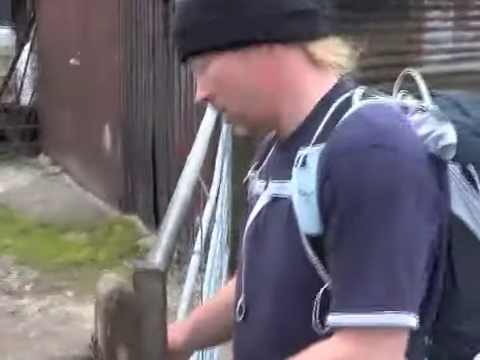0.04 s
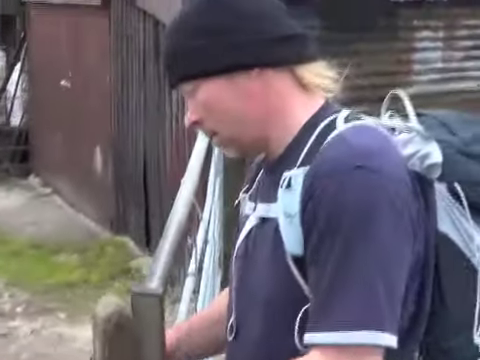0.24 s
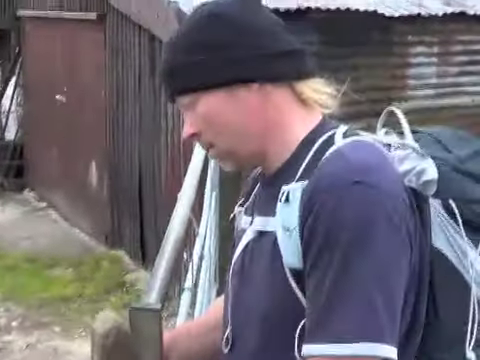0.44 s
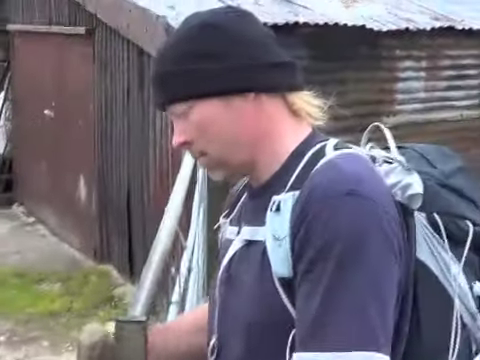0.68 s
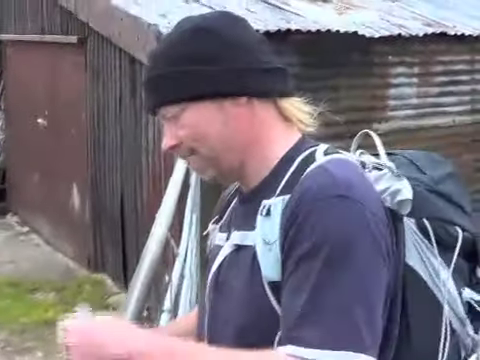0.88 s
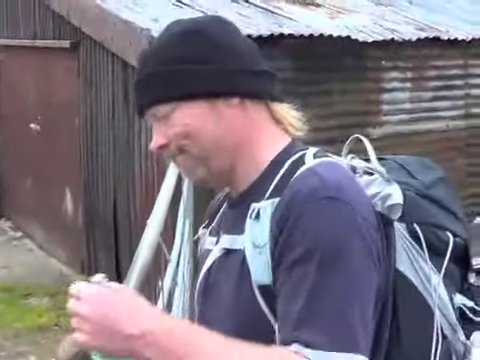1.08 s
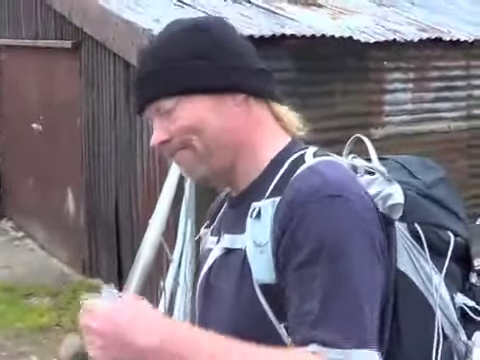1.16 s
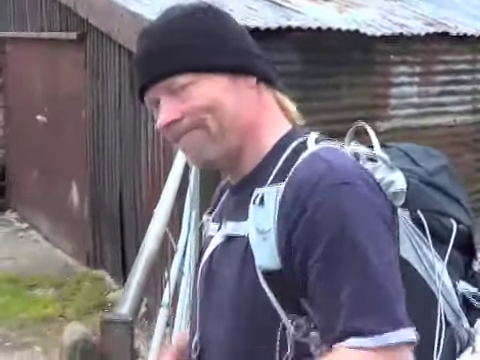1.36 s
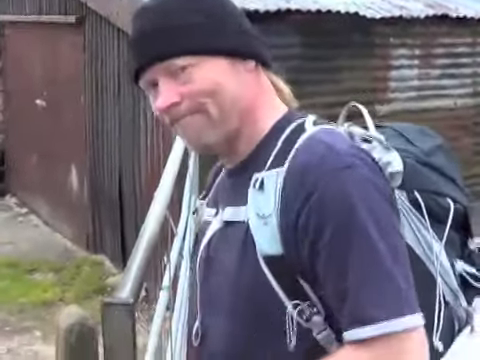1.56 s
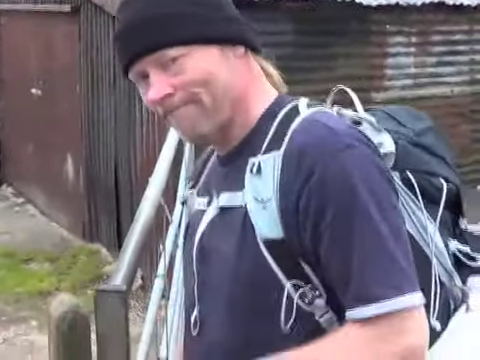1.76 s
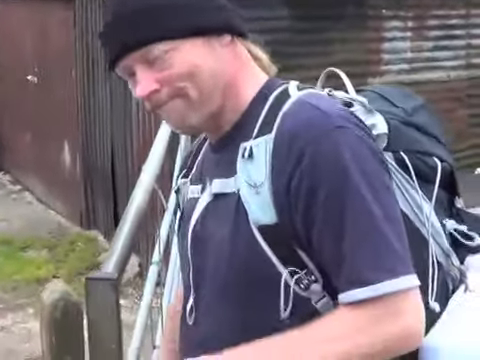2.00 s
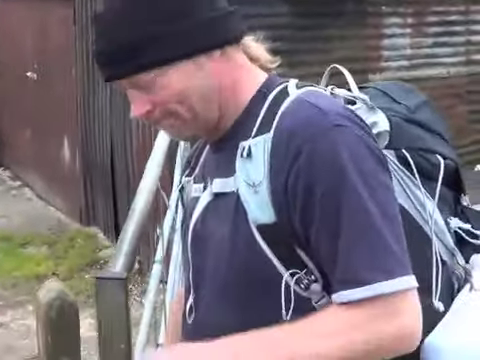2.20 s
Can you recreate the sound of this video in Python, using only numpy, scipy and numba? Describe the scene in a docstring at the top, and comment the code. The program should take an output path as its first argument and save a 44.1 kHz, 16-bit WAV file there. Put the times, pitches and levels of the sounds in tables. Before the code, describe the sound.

A steel chain is unhooked from a hollow tubular gate, heard close outdoors. Dry link ticks and light clinks open the first half second. From about 0.7 seconds bright jangles and short scraping slides ring on the tube, strongest near 0.85, 1.2 and 1.8-2.0 seconds. Around 2.1 the gate clunks with last clinks. Low wind buffets and quiet yard hush lie underneath.

```python
"""Dry ticks of hand-held links come first, then a steel chain is unhooked and pulled over a tubular farm gate.
Each contact, close to the microphone, rings small bright links and the hollow tube as decaying modes.
Scrapes are stick-slip grains of noise; at the end the freed gate clunks, as decaying noise.
Shaped noise makes wind buffet the microphone over a quiet yard.
A limiter ducks everything under the loudest jangles."""
import sys
import numpy as np
from scipy import signal
from scipy.fft import rfft, irfft, next_fast_len
from scipy.io import wavfile
from numba import njit

SR = 44100
rng = np.random.default_rng(int(sys.argv[2]) if len(sys.argv) > 2 else 0)


def dump_mix(stems):
    """Bounce the given channels to the path in sys.argv[1] as a 16-bit WAV at rate SR."""
    frames = np.atleast_2d(stems).T  # one column per channel
    limited = np.clip(frames, -1, 1)  # hard clip at full scale
    pcm = np.round(limited * 32767).astype(np.int16)
    wavfile.write(sys.argv[1], SR, pcm)


N = 98519

# single blows of the chain on the gate: start_s, links_db, tube_db, link_brightness_db
KNOCK_TABLE = [(.206, -28, -39, -6.5), (.311, -55, -36, 0), (.3180, -26, -19, -4), (.326, -29, -26, -2),
               (.351, -23.5, -33, -1.5), (0.448, -45, -32.5, 4), (.459, -55, -34.5, 5),
               (.835, -14.5, -21, -7), (.853, -21, -20, -11), (.989, -18, -23, -23), (1.119, -34, -46, 13),
               (1.130, -23.5, -24.5, 8.5), (1.203, -19.5, -24, 2), (1.375, -24, -34, 4),
               (1.381, -22.5, -47, 6), (1.544, -18.5, -29.5, -1), (1.755, -18.5, -33, 0.5),
               (1.761, -17, -26.5, -9), (1.79, -36, -21.5, 0), (1.802, -4.5, -36, -1), (1.851, -12, -22, 3),
               (2.122, -19.5, -22.5, -1), (2.146, -31.5, -23, 11), (2.185, -16.5, -25.5, -5.5)]
BOUNCE_S, BOUNCE_DB = .007, -12  # average delay of the bounce, and its level against the blow
# slides of the chain over a bar, levels before the touch offset:
# start_s, length_s, links_db, tube_db, link_brightness_db, swell_db (start to end)
RUN_TABLE = [(0.221, .42, -64, -35.5, -7, 0.5), (0.555, 0.1, -50, -37, 4, -10),
             (0.648, .06, -43, -27, 6, 3), (0.704, 0.14, -23, -22.5, -2, 5.5),
             (0.845, 0.031, -10.5, -20, -4.5, 10), (0.886, 0.083, -26.5, -22.5, -1, -5.5),
             (.965, 0.1, -24.5, -22, -6, -5), (1.098, 0.11, -20, -22.5, 2, -0.5),
             (1.212, 0.069, -4.5, -14.5, 3.5, 1), (1.27, 0.052, -15, -20.5, -4, -3),
             (1.33, 0.098, -28.5, -30, -7, 12), (1.519, 0.08, -35, -29, 9, 4),
             (1.572, 0.05, -14, -20, 0.5, 4), (1.621, 0.25, -28.5, -28.5, -2, -4.5),
             (1.812, 0.11, -5.5, -20, -3.5, 0), (1.909, 0.088, -9, -16.5, -4, -4),
             (2.0, 0.11, -35.5, -25.5, -2, -7.5), (2.128, 0.093, -32.5, -35, 6.5, 12)]
TOUCHES_PER_S, TOUCH_DB, TOUCH_SCATTER_DB, RUN_EDGE_S = 190, -12, 5.5, 0.02
SPOT_S = .09  # the sliding chain moves on to a new link this often
BRIGHT_HZ = 10770  # link brightness acts fully above this

# strongest modes of a link, before its size detunes them: pitch_hz, level_db, t60_s
LINK_MODE_TABLE = [(7733, -5, .2), (8917, -4, .2), (9103, -1, .22), (9319, -3, .2), (9568, -5, .2),
                   (9899, -2, .2), (10005, -2, .18), (10234, -1, .2), (10397, 0, .2), (10610, -1, .18),
                   (10949, -2, .2), (11342, -5, .18), (13146, -8, .16)]
# outline of a link's many weaker modes: pitch_hz, level_db
LINK_OUTLINE = [(1500, -35), (3500, -17), (5900, -16.5), (6800, -8.5), (7400, -8), (8800, -1.5),
                (10400, -0.5), (11800, -4.5), (14000, -7), (15500, -18.5)]
LINK_SIZE_SPREAD = .004  # standard deviation of the pitch ratio
LINK_T60_S, LINK_T60_HZ, LINK_DAMPING = .17, 10000, 0.32  # weak modes: t60 at this pitch, fall-off power
LINK_STRONG_DB, LINK_CLINK_DB = -6.5, 5  # against the weak modes

# strongest modes of the tube: pitch_hz, level_db, t60_s
TUBE_MODE_TABLE = [(1165, -16, .6), (2122, -9, .9), (2336, -8, .6), (2512, -2, .6), (2606, -6, .45),
                   (2760, -1, .5), (2853, -4, .45), (3004, -3, .45), (3120, 0, .5), (3296, -4, .5),
                   (3331, -4, .5), (4240, -7, .35), (4361, -7, .35), (4990, -8, .25), (6750, -3, .22),
                   (7110, -7, .2), (8130, -7, .2), (8600, -6, .2), (10480, -2, .2)]
# outline of the tube's many weaker modes: pitch_hz, level_db
TUBE_OUTLINE = [(200, -26), (420, -23.5), (700, -15.5), (1450, -12), (2100, -5.5), (2450, 1.5), (3300, 5.5),
                (3650, -8), (4300, -0.5), (4700, -8.5), (5000, -4), (5500, -11.5), (6350, -11), (6750, -1),
                (7500, -14), (8800, -5.5), (9600, -15.5), (10400, 2), (12000, -28), (15000, -30)]
TUBE_T60_S, TUBE_T60_HZ, TUBE_DAMPING = 0.29, 2630, 0.43
TUBE_STRONG_DB, TUBE_CLINK_DB = -9.5, 0

BUILD_S = 0.0017  # time constant with which the ring builds up
CLINK_T60_S = 0.024
CLINK_LOW_HZ, CLINK_LOW_DB = 1950, -12  # the clink is thin: turned down below this pitch

# dull scraping of steel on steel: start_s, length_s, resonance_hz, level_db
SCRAPE_TABLE = [(0.617, .18, 1850, -35.5), (1.093, 0.2, 737, -38), (1.558, 0.095, 655, -42.5)]
SCRAPE_GRAINS_PER_S, SCRAPE_T60_S = 320, 0.077
SCRAPE_SKIRT_DB = -24  # an octave either side of the resonance

# dry ticks of links held in the hand: start_s, level_db
TICK_TABLE = [(.0265, -25), (.031, -36), (.066, -26), (.0755, -33), (.086, -26.5), (.1222, -18),
              (.160, -32.5), (.2795, -35), (.4240, -19.5), (.6445, -19.5)]
# spectrum of a tick: pitch_hz, level_db
TICK_OUTLINE = [(1500, -24), (4000, -11.5), (7000, -3.5), (10000, 5.5), (12500, -3), (16000, -8)]
TICK_T60_S = 0.0095

# jolts of the whole frame: start_s, level_db
CLUNK_TABLE = [(2.119, -22), (2.165, -24.5)]
# spectrum of a clunk: pitch_hz, level_db
CLUNK_OUTLINE = [(100, -10), (300, -8.5), (600, 2.5), (1200, 0), (1900, 4.5), (3000, 11.5), (8000, -49)]
CLUNK_T60_S = 0.42

# buffets of wind on the microphone: start_s, length_s, level_db
BUFFET_TABLE = [(-0.01, 0.11, -48), (0.193, 0.09, -33), (0.334, 0.089, -38.5), (0.443, 0.064, -31),
                (0.526, 0.08, -32.5), (0.604, 0.033, -39.5), (0.666, .06, -37), (0.764, 0.21, -48),
                (1.062, 0.032, -48), (1.398, 0.076, -50.5), (1.583, 0.066, -58), (1.7, 0.041, -45.5),
                (1.92, 0.085, -43.5), (2.079, 0.072, -40)]
# spectrum of the wind: pitch_hz, level_db
WIND_OUTLINE = [(15, -1), (40, -3.5), (75, 3.5), (130, -2), (200, -8.5), (350, -19), (900, -54)]
BREEZE_DB, BUFFET_EDGE_S = -54, 0.007
# spectrum of the yard's hush: pitch_hz, level_db
YARD_OUTLINE = [(30, -29), (250, -3), (500, -1), (1200, -4), (3000, -8), (6000, -9.5), (10000, -6.5),
                (15000, -24)]
YARD_DB = -43.5

# stereo width, as the filter on the side signal: pitch_hz, side_minus_mid_db
WIDTH_OUTLINE = [(30, -12.5), (130, -5), (280, -5.5), (550, -11), (1200, -10), (2800, -38.5), (4200, -29),
                 (5600, -11), (7000, -11.5), (9500, -21), (13000, -85)]
SCATTER_T60_S = 0.18  # decay of the reflections
LIMIT_DB, LIMIT_ATTACK_S, LIMIT_RELEASE_S = -7.5, 0.000067, 0.042
TOP_HZ = 15450


def chain_and_gate(count=8):
    """Links of slightly different size take turns to hit different spots of the tube."""
    times, links, tube, bright, turn = contacts()
    plain_links = bright_links = bars = 0
    for k in range(count):
        own = turn % count == k
        link, bar = link_answer(), tube_answer()
        plain_links = plain_links + strike(times[own], links[own], link)
        bright_links = bright_links + strike(times[own], (links * bright)[own], link)
        bars = bars + strike(times[own], tube[own], bar)
    # only the treble takes on the brightness of each contact
    treble_change = colour(bright_links - plain_links, [(0.53 * BRIGHT_HZ, -30), (BRIGHT_HZ, 0)])
    return bars + plain_links + treble_change


def contacts():
    """All touches of chain on gate: arrays of time_s, links gain, tube gain, brightness gain and turn."""
    return np.vstack(knock_contacts() + run_contacts()).T


def knock_contacts():
    """A knock is one blow and one softer bounce, which falls to the next link."""
    rows = []
    lateness = rng.random(len(KNOCK_TABLE))
    for k, (start, links_db, tube_db, bright_db) in enumerate(KNOCK_TABLE):
        blow = (start, undb(links_db), undb(tube_db), undb(bright_db), k)
        bounce_start = start + BOUNCE_S * (.5 + lateness[k])
        bounce = (bounce_start, undb(links_db + BOUNCE_DB), undb(tube_db + BOUNCE_DB), undb(bright_db), k + 1)
        rows.append([blow, bounce])
    return rows


def run_contacts(count=130):
    """A run is a hail of small touches of uneven force as links slide over the bar."""
    rows = []
    for start, length, links_db, tube_db, bright_db, swell_db in RUN_TABLE:
        age = (np.arange(count) + rng.random(count)) / TOUCHES_PER_S
        scatter_db = TOUCH_SCATTER_DB * np.minimum(rng.standard_normal(count), 2)
        slope_db = swell_db * (np.minimum(age / length, 1) - .5)
        fade_out = np.clip((length - age) / RUN_EDGE_S, 0, 1)
        size = undb(TOUCH_DB + scatter_db + slope_db) * fade_out
        bright = np.full(count, undb(bright_db))
        turn = (start + age) // SPOT_S + rng.integers(0, 2, count)
        rows.append(np.c_[start + age, size * undb(links_db), size * undb(tube_db), bright, turn])
    return rows


def link_answer():
    """Ring of one small link, whose size shifts its strong modes together."""
    detune = 1 + LINK_SIZE_SPREAD * rng.standard_normal()
    modes = [(hz * detune, db, t60) for hz, db, t60 in LINK_MODE_TABLE]
    return steel(modes, LINK_OUTLINE, LINK_T60_HZ, LINK_T60_S, LINK_DAMPING,
                 LINK_STRONG_DB, LINK_CLINK_DB, count=110)


def tube_answer():
    """Ring of the hollow tube struck at one spot, which favours some modes over others."""
    return steel(TUBE_MODE_TABLE, TUBE_OUTLINE, TUBE_T60_HZ, TUBE_T60_S, TUBE_DAMPING,
                 TUBE_STRONG_DB, TUBE_CLINK_DB, count=190)


def steel(modes, outline, centre_hz, t60, damping, strong_db, clink_db, count):
    """Answer to one contact: a short clink, the strong modes and a crowd of weaker, damped ones."""
    weak = crowd(outline, lambda hz: t60 * (centre_hz / hz) ** damping, count)
    clink = crowd(outline, lambda hz: np.full(len(hz), CLINK_T60_S), count // 2, low_db=CLINK_LOW_DB)
    # each answer favours other modes by up to about 3 dB
    strong = ring([(hz, undb(db + rng.uniform(-2.82, 3)), mode_t60) for hz, db, mode_t60 in modes])
    build = 1 - np.exp(-np.arange(len(weak)) / SR / BUILD_S)
    return build * (weak + undb(strong_db) * strong + undb(clink_db) * clink)


def crowd(outline, t60_at, count, low_db=0):
    """Modes strewn at random under an outline, as in a body with many resonances."""
    low_hz, high_hz = outline[0][0], outline[-1][0]
    hz = low_hz + (high_hz - low_hz) * (np.arange(count) + rng.random(count)) / count
    low_cut = np.where(hz < CLINK_LOW_HZ, undb(low_db), 1)
    gain = gain_at(hz, outline) * rng.uniform(0.73, 1, count) * low_cut
    return ring(list(zip(hz, gain, t60_at(hz))))


def ring(modes, count=22000):
    """Sum of decaying sine partials (pitch_hz, gain, t60_s), scaled for a starting level of 1."""
    hz, gain, t60 = np.array(modes, np.float32).T[:, :, None]
    t = np.arange(count, dtype=np.float32) / SR
    phase = rng.uniform(0, 2 * np.pi, hz.shape).astype(np.float32)
    decay = np.exp(-float(np.log(1000)) / t60 * t)
    partials = gain * np.sin(2 * np.pi * hz * t + phase) * decay
    return partials.sum(axis=0) / np.sqrt(np.sum(gain ** 2) / 2)


def scrapes(count=90):
    """Stick-slip grains swell and fade in a broad resonance."""
    out = 0
    for start, length, hz, db in SCRAPE_TABLE:
        age = (np.arange(count) + rng.random(count)) / SCRAPE_GRAINS_PER_S
        swell = np.sqrt(np.abs(np.sin(np.pi * np.minimum(age / length, 1))))
        size = undb(db) * rng.random(count) * swell
        resonance = [(hz / 2, SCRAPE_SKIRT_DB), (hz / 1.23, 0), (hz * 1.06, 0), (hz * 2, SCRAPE_SKIRT_DB)]
        grain = noise(resonance) * fade(SCRAPE_T60_S)
        out = out + strike(start + age, size, grain)
    return out


def hand_ticks():
    """Links held in the hand are damped, so they tick as very short bright noise."""
    return blows(TICK_TABLE, TICK_OUTLINE, TICK_T60_S)


def gate_clunks():
    """The jolted frame answers with longer-dying noise, strongest in the middle range."""
    return blows(CLUNK_TABLE, CLUNK_OUTLINE, CLUNK_T60_S)


def blows(table, outline, t60):
    """Hits that die away without a clear pitch: decaying shaped noise."""
    return sum(strike(np.array([start]), undb(db), noise(outline) * fade(t60)) for start, db in table)


def air():
    """Wind and yard together, drawn afresh at each call."""
    return wind() + yard()


def wind():
    """Low noise of a steady breeze, raised by buffets on the microphone."""
    t = np.arange(N) / SR
    level = undb(BREEZE_DB)
    for start, length, db in BUFFET_TABLE:
        edge_distance = np.minimum(t - start, start + length - t)
        level = level + undb(db) * np.clip(edge_distance / BUFFET_EDGE_S + .5, 0, 1)
    return noise(WIND_OUTLINE) * level * flutter(46.72, depth_db=1.5)


def yard():
    """The hush of the yard: soft shaped noise whose level wanders slightly."""
    return noise(YARD_OUTLINE) * undb(YARD_DB) * flutter(60, depth_db=1.3)


def flutter(rate, depth_db):
    """A gain that wanders between random levels, with rate new levels a second."""
    t = np.arange(N) / SR
    return undb(depth_db * np.interp(t * rate, np.arange(N), rng.standard_normal(N)))


def strike(times, sizes, answer):
    """Play an answer at each time and size, by convolving it with impulses."""
    push = np.zeros(N)
    np.add.at(push, np.clip((times * SR).astype(int), 0, N - 1), sizes)
    return signal.fftconvolve(push, answer)[:N]


def noise(outline):
    """Noise of level 1 with a given outline."""
    return unit(colour(rng.standard_normal(N), outline))


def colour(x, outline):
    """Filter a sound by an outline of pitch_hz, level_db."""
    size = next_fast_len(N, real=True)
    hz = np.arange(size // 2 + 1) * SR / size
    return irfft(rfft(x, size) * gain_at(hz, outline), size)[:N]


def gain_at(hz, outline):
    """Gain of an outline at each pitch, interpolated over log pitch."""
    points_hz, points_db = np.array(outline).T
    return undb(np.interp(np.log(hz + 1e-3), np.log(points_hz), points_db))


def fade(t60, count=N):
    """Exponential decay that loses 60 dB in t60 seconds."""
    return np.exp(-np.log(1000) * np.arange(count) / SR / t60)


def unit(x):
    """Scale a sound to an RMS level of 1."""
    return x / np.sqrt(np.mean(x ** 2) + 1e-20)


def undb(db):
    """Decibels to gain."""
    return 10 ** (np.asarray(db) / 20)


def scene():
    """The metal is straight ahead; reflections and moving air give the width."""
    metal = chain_and_gate() + scrapes() + hand_ticks() + gate_clunks()
    scatter = rng.standard_normal(N) * fade(SCATTER_T60_S)
    reflections = signal.fftconvolve(metal, scatter / np.linalg.norm(scatter))[:N]
    mid = metal + air()
    side = colour(reflections + air(), WIDTH_OUTLINE)
    return np.array([mid + side, mid - side])


@njit
def follow(x, attack, release):
    """Peak follower: one-pole smoothing, with separate rising and falling rates per sample."""
    out, level = np.empty(len(x)), 0.
    for i in range(len(x)):
        level += (x[i] - level) * (attack if x[i] > level else release)
        out[i] = level
    return out


def record(dry):
    """A fast limiter shared by both channels, then a steep cut of the top."""
    loudest = np.abs(dry).max(axis=0)
    peak = follow(loudest, 1 / (LIMIT_ATTACK_S * SR), 1 / (LIMIT_RELEASE_S * SR))
    held = dry / np.maximum(1, peak / undb(LIMIT_DB))
    top_cut = signal.ellip(10, .2, 80, TOP_HZ, fs=SR, output="sos")
    return signal.sosfilt(top_cut, held)


dry = scene()
out = record(dry)
dump_mix(out)
```